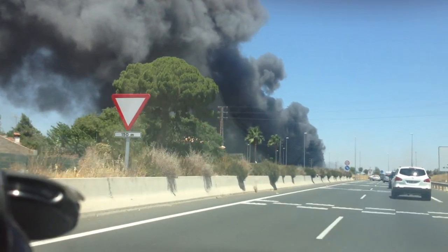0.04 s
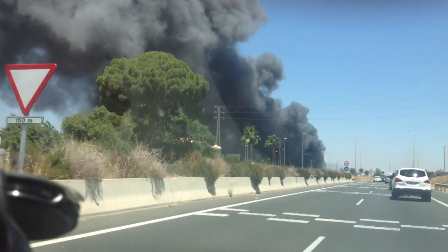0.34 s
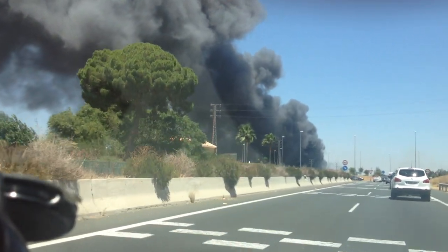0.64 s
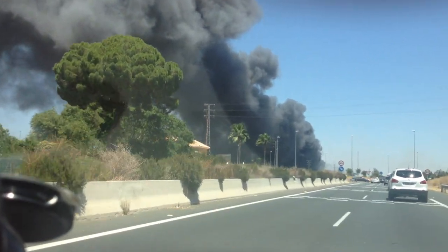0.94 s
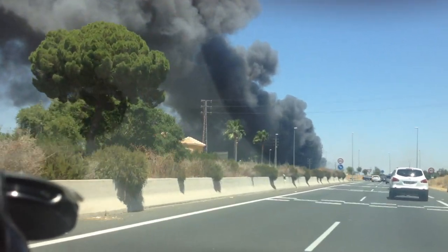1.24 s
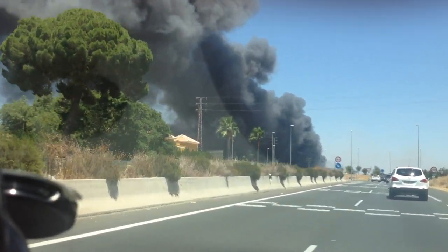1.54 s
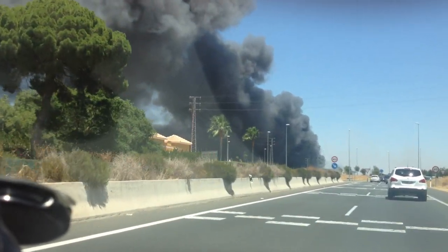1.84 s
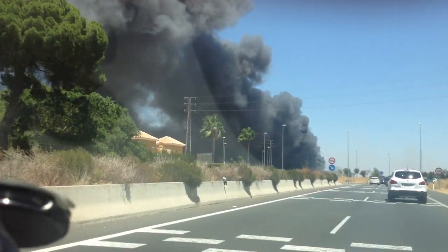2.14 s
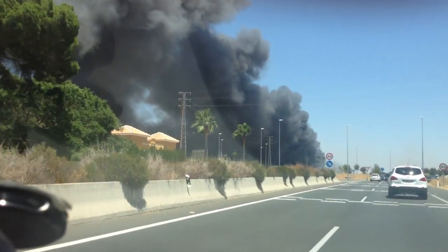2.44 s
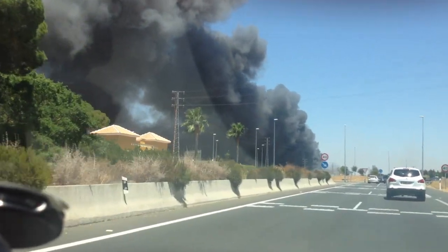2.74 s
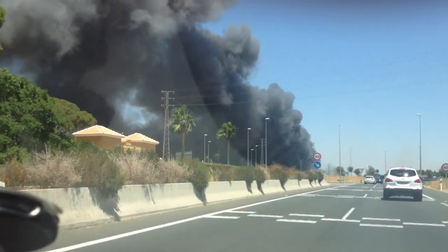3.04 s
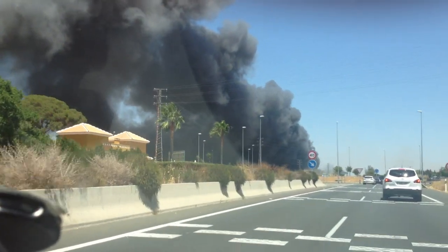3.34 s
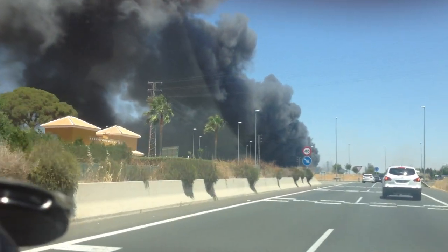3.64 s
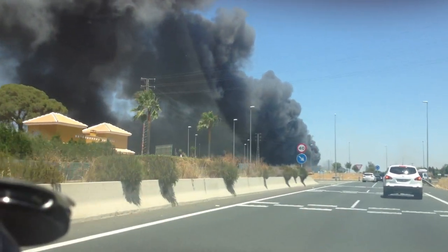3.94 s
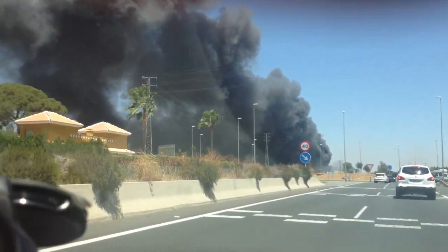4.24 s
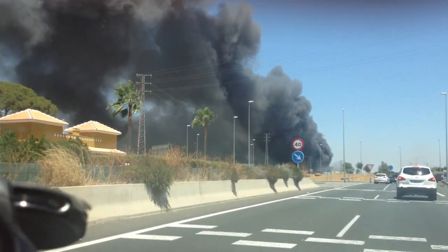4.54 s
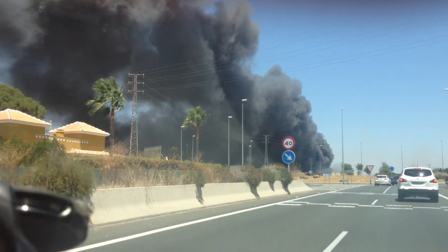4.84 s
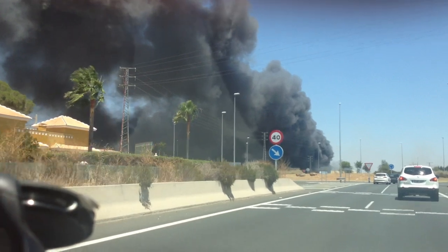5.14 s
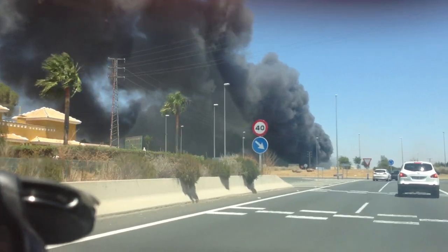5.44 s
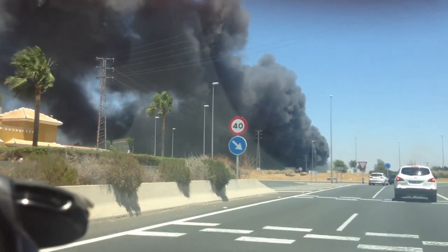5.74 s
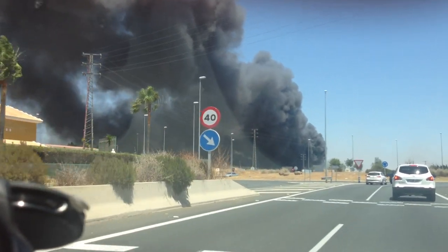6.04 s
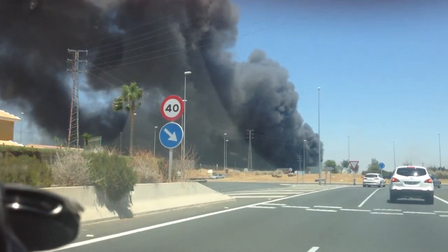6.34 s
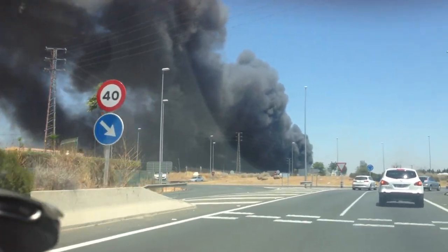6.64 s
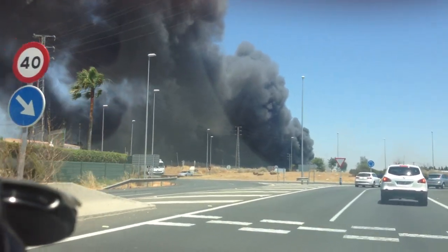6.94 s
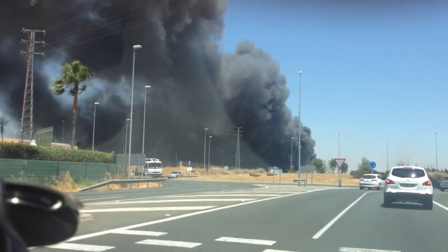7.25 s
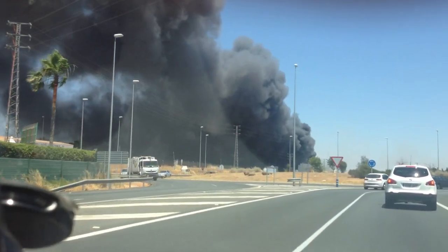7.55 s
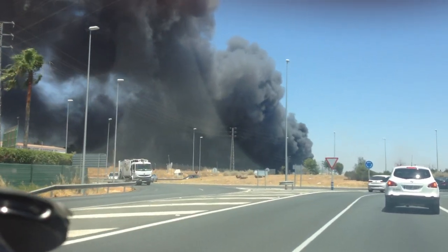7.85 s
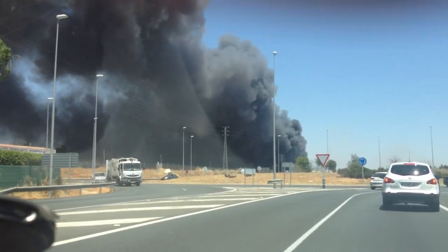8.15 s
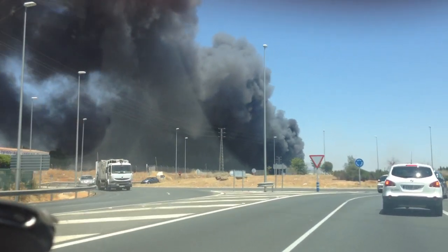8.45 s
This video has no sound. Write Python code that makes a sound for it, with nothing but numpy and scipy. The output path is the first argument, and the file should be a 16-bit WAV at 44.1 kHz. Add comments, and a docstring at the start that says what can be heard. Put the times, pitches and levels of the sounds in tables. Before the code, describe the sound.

The sound is heard from the front seat inside a moving car, with a steady low road rumble, tyre hum and soft wind hiss throughout. It opens on the tail of a deep thump. The tyres then cross patches of rumble strips at about 1.2, 2.7, 4.0, 5.2, 6.5 and 7.9 seconds. Each crossing is a rapid run of thumps lasting about half a second, front tyres then rear, with a deep cabin boom and a hollow ring. The shaking makes panels thud, plastic trim buzz and clack, and a small metal part jingle thinly, all dying away before the next patch. The booms are heaviest around 2.8 and 4.2 seconds, and the clacks are sharpest near 6.6. Faint plastic ticks, rustles and tiny squeaks come in the gaps. The last crossing is somewhat softer, and the road rumble eases slightly by the end, around 8.7 seconds.

```python
"""A deep boom and a buzzing rattle, heard inside a car that crosses rumble strips about every 1.3 s.
Each strip thumps the front tyres, then the rear: the cabin booms and the air in the tyres rings.
The shaking makes panels thud, plastic trim buzz and clack, and a small metal part jingle.
Road rumble and wind hiss run underneath, with faint ticks, rustles and squeaks."""
import sys
import numpy as np
from scipy import signal
from scipy.fft import rfft, irfft, next_fast_len
from scipy.io import wavfile

SR = 44100
rng = np.random.default_rng(int(sys.argv[2]) if len(sys.argv) > 2 else 0)


def to_wav(sig):
    """Store sig (one row per channel, or 1-D mono) as 16-bit WAV at the path in sys.argv[1].

    Samples outside -1..1 are clipped; the rate is SR.
    """
    pcm = np.clip(np.atleast_2d(sig), -1, 1) * 32767
    pcm = np.round(pcm).astype(np.int16)
    wavfile.write(sys.argv[1], SR, pcm.T)  # frames by channels


N = 384111
T = np.arange(N) / SR

# single heavier thumps on a raised edge: (time [s], cabin boom [dB], tyre ring [dB])
HEAVY_THUMPS = [(0.008, -15, -38), (1.232, -36, -19.5), (1.285, -29, -21.5), (1.398, -42, -43),
                (1.473, -18.5, -43), (1.513, -17, -27.5), (2.775, -12, -23.5), (2.856, -35, -17.5),
                (2.932, -14, -58), (3.017, -16.5, -25), (4.029, -33, -14.5), (4.135, -21.5, -22.5),
                (4.36, -14.5, -24.5), (4.398, -19, -30), (5.225, -23.5, -21), (5.36, -32, -22),
                (5.446, -15.5, -45), (5.571, -17, -31.5), (6.501, -24, -23), (6.667, -31, -25.5),
                (7.876, -24, -24), (7.935, -20.5, -30.5), (8.111, -21, -38), (8.351, -17, -37)]
# notes the body panels ring at: (pitch [Hz], width [Hz], level [dB])
PANEL_NOTES = [(364, 26.4, 4), (440, 28.4, 2), (513.4, 39.3, 2), (617, 37, -2), (770.6, 44, -3),
               (864, 33, -8), (961, 11, -7.5), (1136, 30, -12)]
# tone of the tread slapping an edge: (frequency [Hz], level [dB])
SLAP_TONE = [(20, -14), (40, -6.5), (90, -0.5), (350, -0.5), (480, -1.5), (700, -5.5), (1000, -14.5),
             (2000, -21), (4000, -44), (9000, -72.5)]
# tone of the deep thump the suspension passes to the floor: (frequency [Hz], level [dB])
THUMP_TONE = [(20, -33), (40, -22.5), (58, -18.5), (74, -10), (88, 11.5), (104, 11.5), (125, -4),
              (200, -50), (800, -100)]
def rumble_strips():
    """Each edge slaps the tread, rings tyre and panels, thumps the suspension and booms in the cabin."""
    out = np.zeros(N)
    lead_s = 0.01273  # boom, tyre ring and thump start this long before the slap
    hits = strip_hits()
    heavy = [(s, boom, ring, (boom + 2 * ring) / 3 - 15.5) for s, boom, ring in HEAVY_THUMPS]
    for s, boom_db, ring_db, slap_db, *_ in hits + heavy:
        boom = cabin_boom(rough_push(0.002, 0.24))
        add(out, s - lead_s, at_level(boom, boom_db, 0.0085))
        ring = tyre_ring(rough_push(0.00096, 0.19))
        add(out, s - lead_s, at_level(ring, ring_db, 0.011))
        panels = resonate(rough_push(0.0011, 0.17), PANEL_NOTES)
        add(out, s, at_level(panels, slap_db - 3, 0.013))
        slap = colour(rough_push(0.0022, 0.29), SLAP_TONE)
        add(out, s, at_level(slap, slap_db, 0.022))
    for s, *_, thump_db, _ in hits:
        thump = colour(rough_push(0.0014, 0.16), THUMP_TONE)
        add(out, s - lead_s, at_level(thump, thump_db, 0.0061))
    return out


# patches of strips: (time [s], car speed [m/s], cabin boom [dB], tyre ring [dB], tread slap [dB],
# suspension thump [dB], trim buzz [dB])
STRIP_PATCHES = [(-0.38, 19.6, -24, -19.5, -39, -47, -49.5), (1.212, 21.1, -20, -24.5, -41, -40, -58.5),
                 (2.702, 18.7, -21, -26.5, -39, -32, -56), (4.014, 22.3, -20.5, -24.5, -38.5, -29.5, -51.5),
                 (5.204, 19.3, -22, -25, -39, -28.5, -53), (6.502, 17.85, -24.5, -28.5, -41, -28, -52.5),
                 (7.884, 17.7, -29, -33, -42.5, -33, -53.5)]
def strip_hits():
    """Each strip meets the front tyres, then the rear. Lists each hit's time and its five levels."""
    strip_gap_m, axle_gap_m = 0.72, 2.6
    hits = []
    for start_s, speed, *levels_db in STRIP_PATCHES:
        for along_m in np.arange(8) * strip_gap_m:  # eight strips to a patch
            front_s = along_m / speed
            rear_s = (along_m + axle_gap_m) / speed
            front_db = [-np.exp(-front_s / 0.023), 0, 0, 0, 0]  # the boom builds as the body rocks
            rear_db = [1.5, -7.5, -7.5, -1.5, -10.5 + 0.8 * along_m]  # the buzz grows strip by strip
            hits.append((start_s + front_s, *np.add(levels_db, front_db)))
            hits.append((start_s + rear_s, *np.add(levels_db, rear_db)))
    return hits


# low notes of the cabin: (pitch [Hz], width [Hz], level when struck [dB], level when rolling [dB])
CABIN_NOTES = [(99.4, 30, -7, -16), (145.2, 53.4, -1.5, -6), (181, 33.3, 3, -1.5)]
def cabin_boom(push, rolling=False):
    """The air and panels of the closed cabin boom when pushed."""
    notes = np.array(CABIN_NOTES)[:, [0, 1, 3 if rolling else 2]]
    return band(resonate(push, notes), 82, 230, order=4)


# notes of the air inside the tyres:
# (pitch [Hz], width [Hz], level when struck [dB], level when rolling [dB], pitch fall [Hz/s])
TYRE_NOTES = [(249.1, 21.3, -0.5, 0.5, 0), (281, 28.6, 0.5, -3, 1), (303.4, 18.9, -1, -0.5, 2)]
def tyre_ring(push):
    """The air in a struck tyre gives a hollow ring that travels up through the suspension."""
    return band(resonate(push, np.array(TYRE_NOTES)[:, :3]), 217.5, 378)


# door and floor panels thudding under the hardest strips: (time [s], level [dB])
PANEL_THUDS = [(1.273, -31.5), (1.298, -41), (1.328, -33), (2.789, -46), (2.85, -32), (2.869, -34.5),
               (3.061, -38), (4.089, -33), (4.166, -31.5), (5.379, -38), (5.424, -44), (6.562, -36),
               (6.58, -37), (6.612, -34), (6.655, -35), (6.719, -49), (7.878, -43), (8.017, -49),
               (8.083, -32), (8.364, -47)]
# tone of a thud: (frequency [Hz], level [dB])
THUD_TONE = [(150, -12), (300, 12.5), (370, 6), (480, 1.5), (750, -5.5), (1000, -13), (1300, -14.5),
             (2500, -35), (8000, -74.5)]
def panel_thuds():
    """Large panels give a short, dull thud with a hollow ring."""
    out = np.zeros(N)
    for s, db in PANEL_THUDS:
        thud = colour(rough_push(rise_s=0.0015, fade_s=0.1), THUD_TONE)
        add(out, s, at_level(thud, db, 0.011))
        add(out, s, at_level(resonate(thud, PANEL_NOTES), db - 3.5, 0.0091))
    return out


# tone of buzzing plastic: (frequency [Hz], level [dB])
BUZZ_TONE = [(500, -2), (1000, 4.5), (1800, 12.5), (2200, 0.5), (2650, 8), (3300, 1.5), (4600, -3.5),
             (5200, 0.5), (6100, -5), (7600, -4.5), (9500, -11), (12000, -26.5), (15500, -11)]
# loose trim pieces, one note each: (pitch [Hz], width [Hz], level [dB])
TRIM_NOTES = [(672, 28, -3.5), (1160, 45, 6.5), (1340, 130, 5.5), (1606, 48, 4), (1927, 82, 2.5),
              (2330, 45, 0), (2654, 90, 1), (2780, 40, -2), (3084, 130, -1), (3600, 120, -4),
              (3930, 45, -5), (4310, 45, -7.5), (4645, 100, -7), (6270, 180, -11)]
def trim_buzz():
    """Shaken trim makes a dense crunch, with single pieces ringing, clicking and tinkling through."""
    shake = shaking()
    # each tiny tap lets through about 2 ms of noise
    energy = signal.lfilter([1], [1, -np.exp(-1 / (0.002 * SR))], taps(750, 3.2) ** 2)
    crunch = unit(colour(np.sqrt(energy) * rng.standard_normal(N), BUZZ_TONE))
    rings = sum(gain(db) * unit(resonate(taps(110, 2.6), [(hz, width, 0)]))
                for hz, width, db in TRIM_NOTES)
    plastic_taps = signal.fftconvolve(taps(110, 3), strike(0.025, 0.7))[:N]
    clicks = unit(colour(plastic_taps, SNAP_TONE))
    metal_taps = signal.fftconvolve(taps(70, 3), strike(0.06, 0.4))[:N]
    jumping = np.minimum(shake / gain(-50), 1)  # light metal jumps freely above this much shaking
    tinkle = jumping * unit(resonate(metal_taps, METAL_NOTES))
    mix = gain(-2.4) * crunch + gain(-1.5) * unit(rings) + gain(-11.5) * clicks + gain(-9.5) * tinkle
    return mix * shake


def shaking():
    """How hard the dashboard shakes: jolts from strips and rebounding panels pile up and die away."""
    t = T[:SR]
    lag_s, rise_s = 0.015, 0.0049
    settling = gain(-16) * fade(t, 0.51)
    jolt = (1 - np.exp(-t / rise_s)) * (fade(t, 0.24) + settling)
    energy = np.zeros(N)
    for s, *_, buzz_db in strip_hits():
        add(energy, s + lag_s, (gain(buzz_db) * jolt) ** 2)
    for s, *_, snap_db in TRIM_KNOCKS:
        rebound = gain(snap_db - 3) * fade(t, 0.21)
        add(energy, s, rebound ** 2)
    return np.sqrt(energy)


# trim panels knocking on the hardest jolts: (time [s], pitch [Hz], knock [dB], bright snap [dB])
TRIM_KNOCKS = [(1.241, 1420, -57, -53), (1.2673, 1720, -51, -59), (1.325, 1750, -55, -67),
               (1.548, 1400, -56, -61), (1.578, 2750, -56.5, -66), (2.739, 1890, -52.5, -61),
               (2.8, 1290, -61, -50.5), (2.825, 1660, -54, -56), (2.853, 1380, -46, -52),
               (2.886, 2600, -51, -49), (2.906, 1350, -49.5, -59), (2.943, 1910, -62, -70),
               (3.041, 1660, -49.5, -59), (3.065, 2800, -55, -53), (3.12, 1680, -57, -68),
               (4.028, 1340, -67, -58), (4.071, 2200, -53, -65), (4.128, 1290, -55, -53),
               (4.196, 1650, -54, -64), (4.212, 2100, -52, -57), (4.239, 1700, -55, -60),
               (4.371, 1670, -53, -60.5), (4.395, 2500, -61, -60), (4.446, 4100, -66, -64),
               (5.2322, 1850, -48.5, -46), (5.2543, 1610, -52, -65), (5.268, 1900, -53, -67),
               (5.407, 1800, -48, -58), (5.425, 1790, -46.5, -65), (5.4392, 1900, -49, -47.5),
               (5.58, 1700, -54, -60), (5.624, 1840, -56, -56.5), (6.544, 1990, -47.5, -55),
               (6.557, 1900, -51, -64), (6.593, 1500, -52, -57), (6.6138, 1490, -41, -49),
               (6.634, 2390, -51, -53), (6.656, 1460, -62, -41), (6.701, 1400, -48, -58),
               (6.7059, 2060, -46.5, -49), (6.714, 1650, -56, -52), (6.764, 2400, -61, -53.5),
               (6.849, 2300, -53.5, -60), (7.9046, 1290, -51, -61), (7.931, 1690, -49, -55),
               (7.989, 1700, -55, -71), (8.007, 1660, -50, -60), (8.031, 1640, -52, -57),
               (8.087, 1750, -50, -58), (8.1198, 1660, -52.5, -66), (8.176, 1700, -68, -74),
               (8.245, 2370, -59, -64), (8.42, 1700, -61, -61.5)]
# tone of the knock: (frequency [Hz], level [dB])
KNOCK_TONE = [(600, -7), (1300, 10), (2800, 5.5), (4200, -25), (6000, -33), (15000, -80)]
# tone of the bright snap: (frequency [Hz], level [dB])
SNAP_TONE = [(1500, -31.5), (3500, -2.5), (4600, -2.5), (5200, -3), (6100, -4), (7500, -4), (9200, -14),
             (11000, -12), (15000, -22)]
# high notes of the snapping plastic: (pitch [Hz], width [Hz], level [dB])
PLASTIC_NOTES = [(2763, 60, -3), (3924, 70, 1.5), (4620, 100, 0), (5073, 70, -0.5), (6080, 120, -1),
                 (7293, 130, 0)]
def trim_clacks():
    """A panel knocks, sets the loose trim ringing and snaps: a sharp crack with a ringing tail."""
    out = np.zeros(N)
    chance = rng.standard_normal((len(TRIM_KNOCKS), len(TRIM_NOTES), 3))
    for (s, hz, knock_db, snap_db), scatter in zip(TRIM_KNOCKS, chance):
        sharpness = 0.5 + gain(knock_db + 31)  # harder knocks are sharper
        knock = colour(strike(0.035, sharpness), KNOCK_TONE)
        add(out, s, at_level(knock + resonate(knock, [(hz, 110, 6)]), knock_db, 0.018))
        pieces = np.array(TRIM_NOTES) + scatter * [10, 0, 4]
        ring = resonate(strike(0.09, 0.33), pieces)
        add(out, s, at_level(ring, knock_db + 1.5, 0.0074))
        crack = colour(rough_push(rise_s=0.0003, fade_s=0.018), SNAP_TONE)
        add(out, s, at_level(crack, snap_db - 3, 0.008))
        tail = colour(strike(fade_s=0.092, sharpness=0.3), SNAP_TONE)
        tail += gain(6.5) * resonate(tail, PLASTIC_NOTES)
        add(out, s, at_level(tail, snap_db - 3.5, 0.0073))
    return out


# hardest bounces of a small loose metal part: (time [s], level [dB])
METAL_BOUNCES = [(1.4266, -55), (1.495, -53.5), (1.556, -54), (2.8015, -46), (2.822, -43), (2.883, -47),
                 (2.914, -50), (3.041, -58), (3.0669, -52), (4.095, -51), (4.129, -46), (4.1719, -50),
                 (4.198, -48), (4.2782, -54), (5.335, -49.5), (5.4001, -54), (5.4355, -55), (5.458, -47),
                 (5.4737, -48), (6.591, -47), (6.655, -55), (6.735, -46), (6.765, -50), (8.004, -51),
                 (8.0316, -53), (8.12, -55)]
# notes the part rings at: (pitch [Hz], width [Hz], level [dB])
METAL_NOTES = [(10400, 350, -19), (12760, 330, -8.5), (13200, 400, -14.5), (13950, 240, 0.5),
               (14280, 240, -8), (14620, 180, -2), (14850, 170, 2.5), (15900, 160, 3)]
def metal_jingle():
    """A small metal part bounces on plastic and rings very high, struck at a new spot each time."""
    out = np.zeros(N)
    chance = rng.standard_normal((len(METAL_BOUNCES), len(METAL_NOTES), 3))
    for (s, db), scatter in zip(METAL_BOUNCES, chance):
        notes = np.array(METAL_NOTES) + scatter * [70, 0, 3.5]
        contact = strike(fade_s=0.089, sharpness=0.2)
        ring = resonate(contact, notes) + gain(-17) * band(contact, 13600, 15400)
        add(out, s, at_level(ring, db, 0.0032))
        plastic_snap = colour(strike(0.089, 0.39), BUZZ_TONE)
        add(out, s, at_level(plastic_snap, db - 3, 0.0081))
    return out


# lone plastic ticks: (time [s], level [dB])
LONE_TICKS = [(0.1316, -50), (0.567, -52.5), (1.208, -71), (1.7624, -61.5), (2.1825, -55.5),
              (2.6327, -60.5), (4.5401, -64), (4.963, -63), (5.8012, -61), (6.264, -66), (6.897, -68),
              (6.913, -69), (6.951, -74), (8.4667, -62)]
# tone of a tick: (frequency [Hz], level [dB])
TICK_TONE = [(1500, -40), (2400, -26), (3000, -2.5), (4000, -5.5), (4800, -1), (6000, -8), (7100, 1.5),
             (8500, -5), (10500, -17), (15000, -17)]
def plastic_ticks():
    """Now and then a plastic joint ticks by itself as the trim settles."""
    out = np.zeros(N)
    for s, db in LONE_TICKS:
        tick = colour(rough_push(rise_s=0.0005, fade_s=0.05), TICK_TONE)
        add(out, s, at_level(tick, db, 0.0067))
    return out


# loudness of the smooth road: (time [s], rumble [dB], tyre and wind hiss [dB])
ROAD_LEVELS = [(0, -27.5, -45), (.9, -28.7, -44.5), (2.198, -29.5, -45.5), (3.6, -29.5, -47),
               (4.8, -29, -46.5), (6.2, -31, -47), (7.4, -29, -47.5), (8.1, -33, -48.5), (8.7, -32.5, -48)]
def road_noise():
    """Grainy asphalt shakes the tyres and cabin, the tread drives the panels and air rushes past."""
    s, rumble_db, hiss_db = np.transpose(ROAD_LEVELS)
    asphalt, air, tread = rng.standard_normal((3, N))
    rumble = unit(cabin_boom(asphalt, rolling=True)) * gain(-4.5) + unit(tyre_hum()) * gain(-3.5)
    rumble *= gain(np.interp(T, s, rumble_db))
    hiss = unit(resonate(tread, PANEL_NOTES)) * gain(-1.05) + unit(wind(air)) * gain(1)
    hiss *= gain(np.interp(T, s, hiss_db))
    surface_db = 0.5 * wander(9)
    return (rumble + hiss) * gain(surface_db)


def tyre_hum():
    """Asphalt keeps the air in the tyres ringing; the upper notes sink as the wheels slow."""
    out = np.zeros(N)
    for hz, width, _, db, fall in TYRE_NOTES:
        ring = resonate(rng.standard_normal(N), [(hz, width, db)])
        ring = signal.hilbert(ring, next_fast_len(N))[:N]  # a form whose pitch can be slid
        shift_hz = fall * (T.mean() - T)
        out += np.real(ring * np.exp(2j * np.pi * np.cumsum(shift_hz) / SR))
    return band(out, 229, 337.5)


# tone of the wind: (frequency [Hz], level [dB])
WIND_TONE = [(20, -28), (45, -7), (80, 6), (330, 7), (420, 2), (900, -5), (1400, -8.5), (2000, -17.5),
             (2700, -24.5), (3800, -35), (7000, -38.5), (10000, -49), (13000, -35), (15500, -39.5)]
# narrow notes in the wind: (pitch [Hz], width [Hz], level against the hiss [dB])
WIND_NOTES = [(980, 21, -11.5), (1680, 30, -8.5), (1757, 36, -9), (2000, 110, -1.5), (2310, 44, -15),
              (2635, 42, -6), (3040, 120, -5), (3590, 60, -12.5), (6660, 100, -6), (7070, 100, -5.5)]
def wind(air):
    """Air rushing past the car makes a broad hiss with a few faint notes in it."""
    hiss = colour(air, WIND_TONE)
    return hiss + sum(resonate(hiss, [note]) for note in WIND_NOTES)


# runs of tiny ticks: (time [s], ticks [count], strength of each [dB])
FINE_TICK_RUNS = [(0.6, 5, -44), (1.986, 6, -42), (2.218, 5, -48), (2.31, 5, -43), (2.39, 3, -47),
                  (2.462, 4, -49), (2.562, 3, -47), (3.214, 4, -45), (3.288, 4, -48), (3.428, 4, -49),
                  (3.5, 3, -49), (4.918, 3, -42)]
def fine_ticking():
    """Quick, even runs of tiny, very high ticks close by, each followed by one late tick."""
    step_s, pause_s = 0.0044, 0.019
    ticks = np.zeros(N)
    for s, count, db in FINE_TICK_RUNS:
        run = s + step_s * np.arange(round(count))
        for tick_s in [*run, run[-1] + pause_s]:
            add(ticks, tick_s, gain([db]))
    return band(ticks, 7900, 12000)


# faint rustles in the cabin: (time [s], length [s], level [dB])
RUSTLE_SWELLS = [(1.04, 0.12, -85), (1.332, 0.073, -59), (2.618, 0.17, -66.5), (7.07, 0.12, -70),
                 (7.375, 0.25, -74.5), (7.555, 0.14, -68), (8.397, 0.15, -69.5)]
# tone of a rustle: (frequency [Hz], level [dB])
RUSTLE_TONE = [(2000, -11), (3800, -2.5), (4500, -1), (5600, -6.5), (7500, -4.5), (10000, -15),
               (15000, -29)]
def rustles():
    """Something rubs softly: a hiss that swells and fades."""
    swell = np.zeros(N)
    for s, length_s, db in RUSTLE_SWELLS:
        add(swell, s, gain(db) * np.hanning(int(length_s * SR)))
    return swell * unit(colour(rng.standard_normal(N), RUSTLE_TONE))


# faint squeaks of rubbing trim: (time [s], length [s], starting pitch [Hz], level [dB])
TRIM_SQUEAKS = [(1.075, .06, 4750, -84), (1.69, 0.091, 4600, -74), (4.54, .06, 4860, -77),
                (7.393, .07, 4580, -78), (7.5, .08, 4500, -79)]
def trim_squeaks():
    """Trim sticks and slips, making a thin, wavering tone that sinks a little."""
    fall_hz_per_s, waver_hz = 1500, 55
    out = np.zeros(N)
    for s, length_s, hz, db in TRIM_SQUEAKS:
        t = T[:int(length_s * SR)]
        pitch = hz - fall_hz_per_s * t + waver_hz * wander(300)[:len(t)]
        tone = np.sqrt(2) * np.sin(2 * np.pi * np.cumsum(pitch) / SR)
        add(out, s, gain(db) * np.hanning(len(t)) * tone)
    return out


def rough_push(rise_s, fade_s):
    """A rough force, like tread rolling over an edge: noise that swells briefly, then dies away."""
    t = T[:12000]
    return rng.standard_normal(len(t)) * (1 - np.exp(-t / rise_s)) * fade(t, fade_s)


def strike(fade_s, sharpness):
    """One contact, as strong as sharpness, followed by a dying scatter of tiny echoes."""
    t = T[:8192]
    hit = rng.standard_normal(len(t)) * fade(t, fade_s)
    hit /= np.sqrt(np.sum(hit ** 2))
    hit[0] += sharpness
    return hit


def taps(per_second, spread_db):
    """Tiny taps at random times, a few much harder than the rest."""
    hit = rng.random(N) < per_second / SR
    return hit * gain(spread_db * np.minimum(rng.exponential(size=N), 4))


def wander(per_second):
    """A random drift of roughly 1 either way."""
    points = rng.standard_normal(512)
    return np.interp(T * per_second, np.arange(len(points)), points)


def fade(t, fade_s):
    """A fade that is 60 dB down after fade_s."""
    return np.exp(-np.log(1000) * t / fade_s)


def resonate(x, notes):
    """Ring at each (pitch, width, level); narrow notes ring longer, neighbours swing opposite ways."""
    return sum((-1) ** k * gain(db) * signal.lfilter(*signal.iirpeak(hz, hz / width, SR), x)
               for k, (hz, width, db) in enumerate(notes))


def colour(x, tone):
    """Shape a sound's lows and highs to follow (frequency, level) points."""
    hz, db = np.transpose(tone)
    size = next_fast_len(len(x) // 2 + 1024) * 2
    freqs = np.maximum(np.arange(size // 2 + 1) * SR / size, 1)
    curve = gain(np.interp(np.log(freqs), np.log(hz), db))
    # fold the filter forward in time, so nothing sounds before the hit that causes it
    folded = irfft(np.log(curve))
    folded[1:size // 2] *= 2
    folded[size // 2 + 1:] = 0
    return irfft(rfft(x, size) * np.exp(rfft(folded)))[:len(x)]


def band(x, low_hz, high_hz, order=3):
    """Keep what lies between two frequencies."""
    return signal.sosfilt(signal.butter(order, [low_hz, high_hz], "band", fs=SR, output="sos"), x)


def gain(db):
    """Turn decibels into a multiplier."""
    return 10 ** (np.asarray(db) / 20)


def unit(x):
    """Scale to an average power of 1."""
    return x / np.sqrt(np.mean(x ** 2) + 1e-20)


def at_level(x, db, span_s):
    """Give a hit the energy of a level db held for span_s."""
    return x * gain(db) * np.sqrt(span_s * SR / np.sum(x ** 2))


def add(out, s, sound):
    """Mix a sound in from time s."""
    i = int(s * SR)
    part = sound[max(-i, 0):max(N - i, 0)]
    out[max(i, 0):max(i, 0) + len(part)] += part


def scene():
    """Everything as it reaches the front seat, in one channel."""
    driving = road_noise() + rumble_strips() + panel_thuds()
    rattles = trim_buzz() + trim_clacks() + plastic_ticks() + metal_jingle()
    faint = rustles() + trim_squeaks() + fine_ticking()
    return (driving + rattles + faint)[None]


def record(dry):
    """Cut off the very highest treble."""
    top_hz = 15250
    return signal.sosfilt(signal.ellip(10, 0.2, 80, top_hz, fs=SR, output="sos"), dry)


dry = scene()
out = record(dry)
to_wav(out)
```